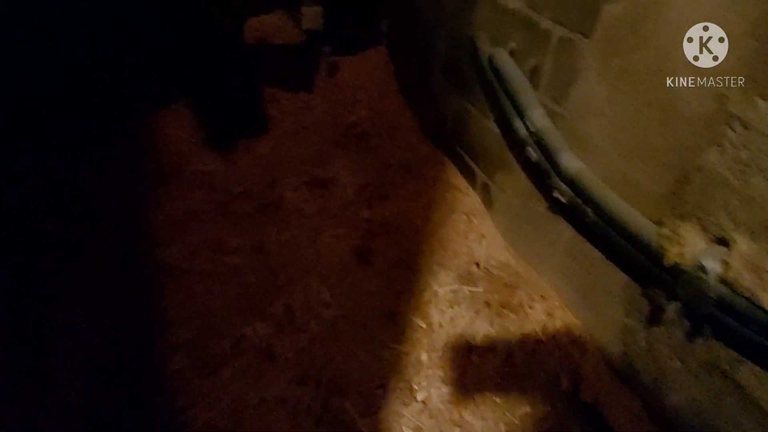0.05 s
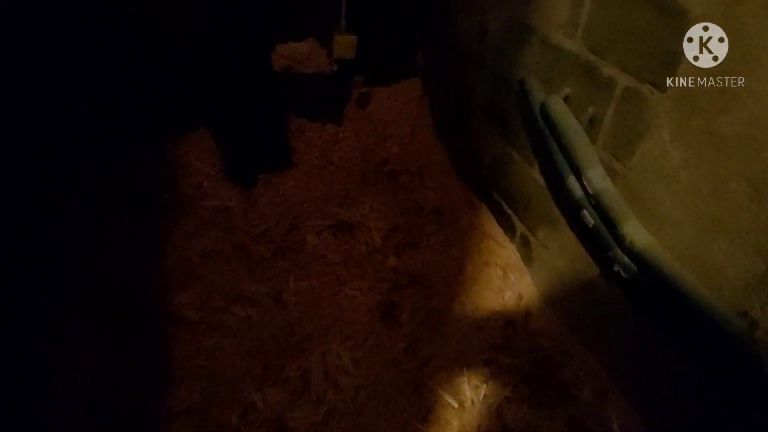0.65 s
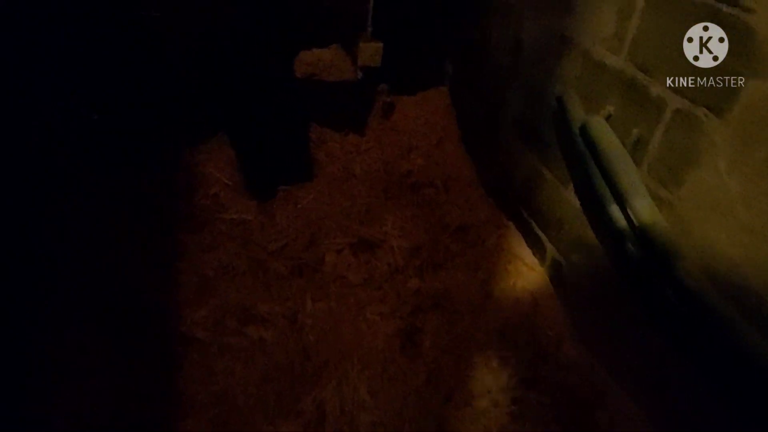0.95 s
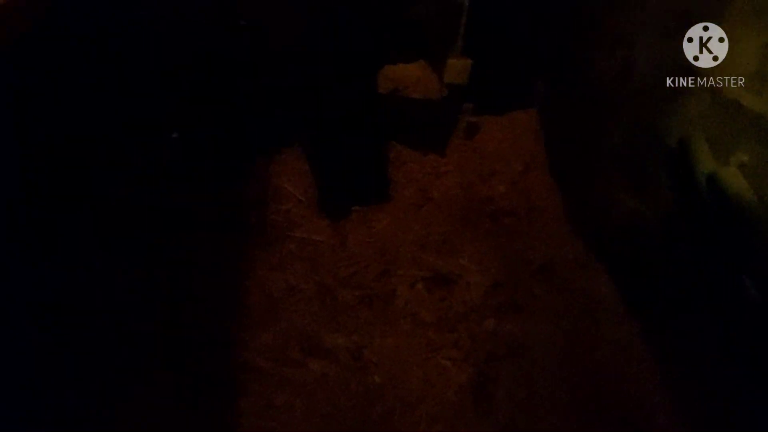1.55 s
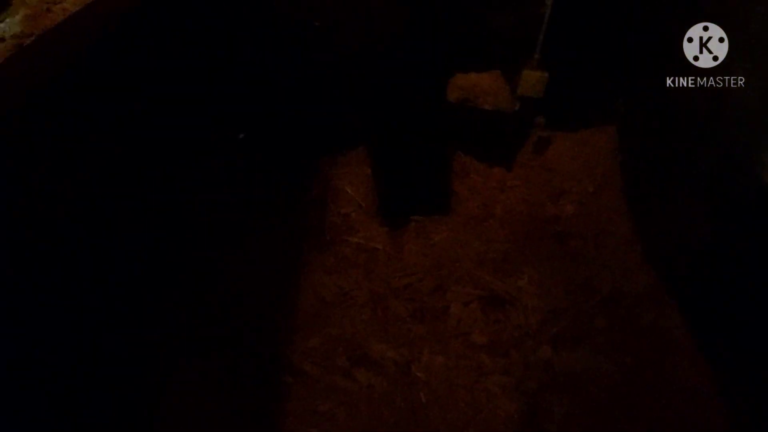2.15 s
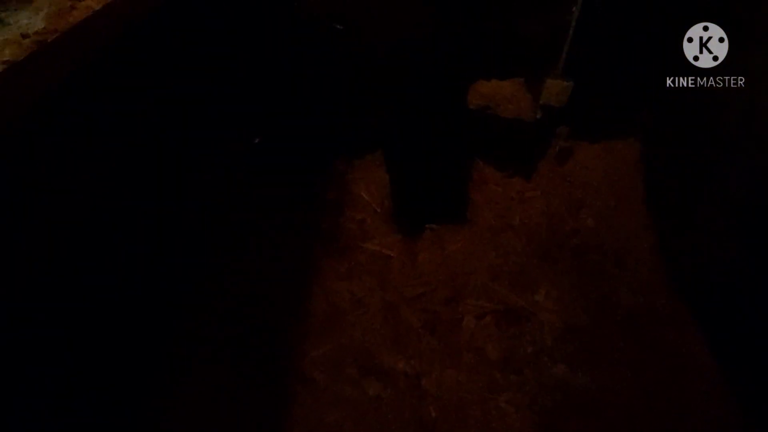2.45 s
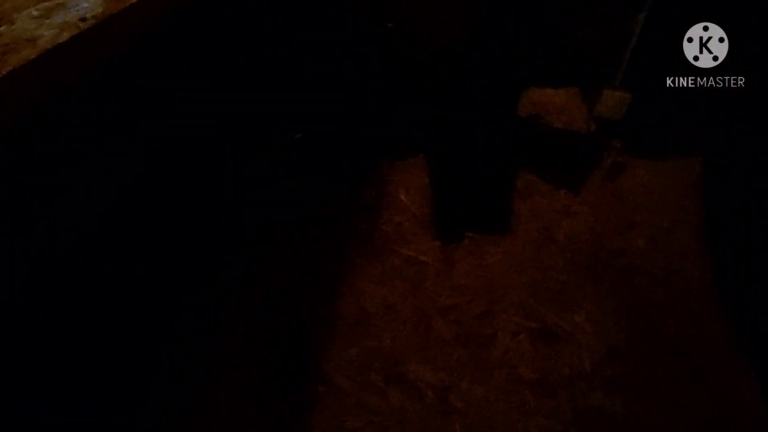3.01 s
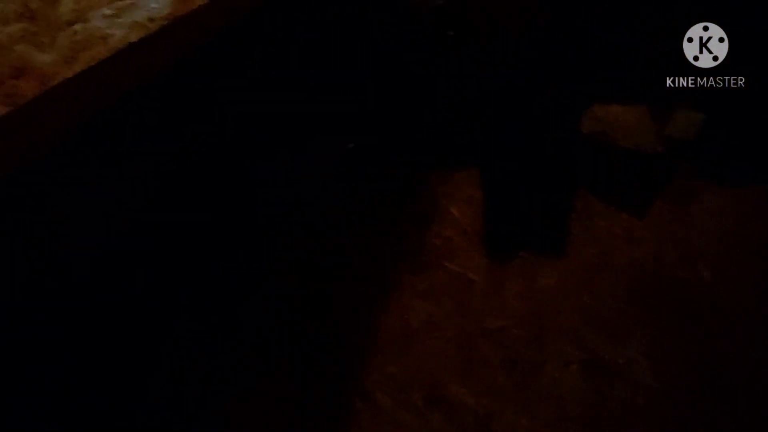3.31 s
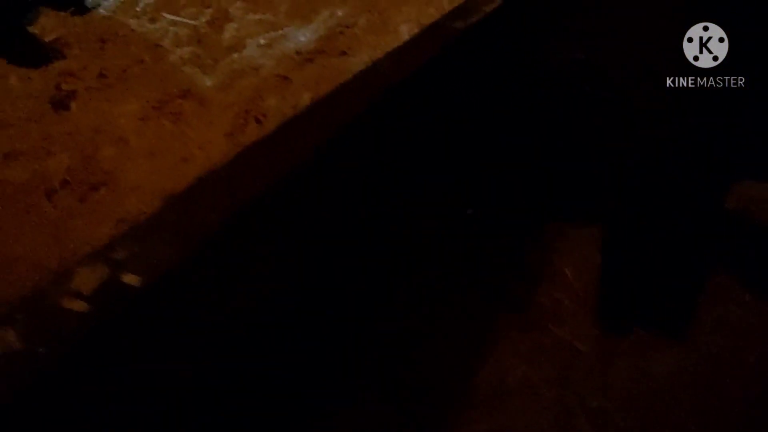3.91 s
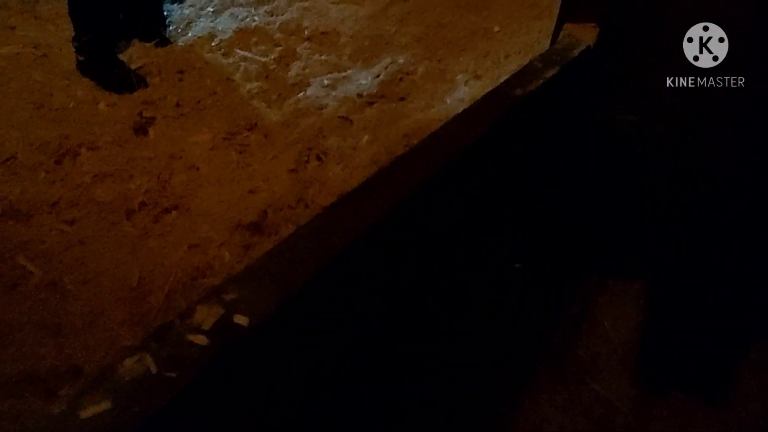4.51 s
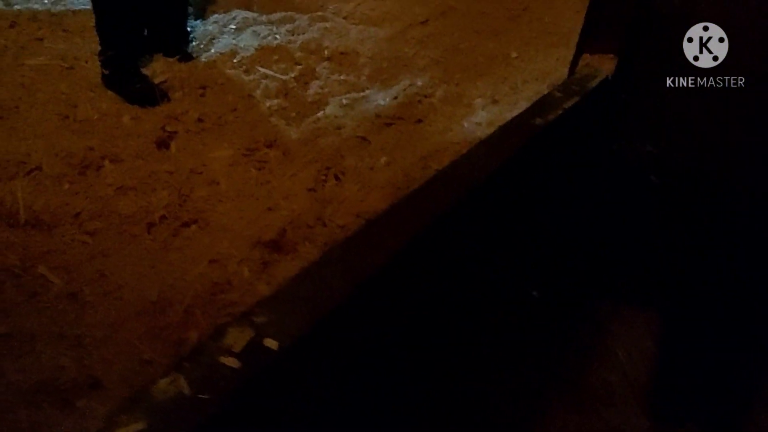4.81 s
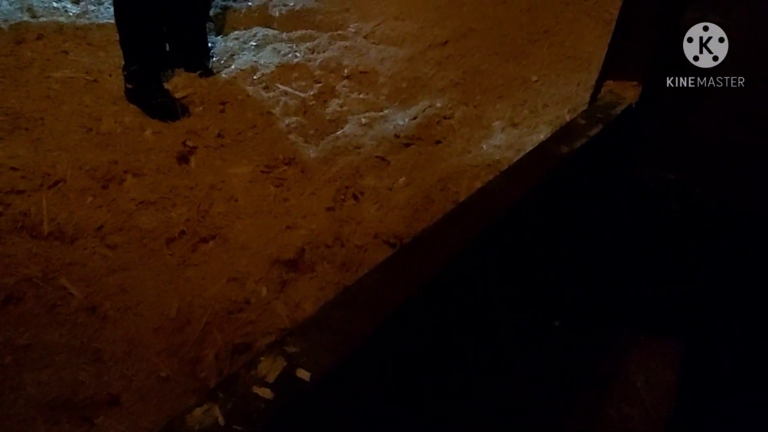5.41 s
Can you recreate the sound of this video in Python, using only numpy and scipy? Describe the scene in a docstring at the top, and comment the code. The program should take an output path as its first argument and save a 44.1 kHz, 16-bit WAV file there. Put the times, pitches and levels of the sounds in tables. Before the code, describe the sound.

Wood chips scrape and sweep across a basement floor, then rustle close by as three heavy thumps hit rattling wooden boards.

```python
"""Dry wood chips scrape over a basement floor: one long push, light strokes and two quick sweeps.
The blade judders and grinds; the chips hiss, crackle and snap among soft footfalls.
Then a bright rustle grows close by, and three heavy thumps with smaller after-knocks ring the modes
of wooden boards, which also rattle and creak. The low stone room rumbles, and booms in answer."""
import sys
import numpy as np
from scipy import signal
from scipy.fft import rfft, irfft, next_fast_len
from scipy.io import wavfile
from scipy.ndimage import uniform_filter1d, map_coordinates

SR = 44100
rng = np.random.default_rng(int(sys.argv[2]) if len(sys.argv) > 2 else 0)


def pcm_store(signal):
    """Save signal as 16-bit PCM."""
    levels = np.round(np.clip(np.atleast_2d(signal), -1, 1) * 32767)
    wavfile.write(sys.argv[1], SR, levels.astype(np.int16).T)


N = 249606
FLOOR_LAG_S = 0.011  # in a sweep the blade meets the floor just after the chips

# Blows on the boards. Each row: start in seconds, force in dB, hardness in dB per octave,
# weight in dB, place from 0 (mid-span) to 1 (near a support).
BOARD_BLOWS = [(3.827, -30.5, 2, -35, 0.93), (3.856, -27, -3, -25.5, 0.37),
               (3.925, -38.5, 1.4, -33.5, 0.084), (4.612, -27, 1, -24.5, 0.81),
               (4.659, -27, -2.5, -31.5, 0.58), (4.732, -42, -5, -32, 0.81), (5.213, -26.5, 3, -40, 0.89),
               (5.24, -20.5, 2, -24.5, 0.85), (5.423, -27, -1, -40, 0.82), (5.479, -36, -1, -45, 0.32)]


def amp(db):
    """Decibels to gain."""
    return 10 ** (np.asarray(db) / 20)


def unit(x):
    """Scaled to rms 1."""
    return x / np.sqrt(np.mean(x ** 2) + 1e-20)


def along(points, hz):
    """(Hz, value) points read on a log axis."""
    point_hz, values = np.transpose(points)
    return np.interp(np.log(hz + 1), np.log(point_hz + 1), values)


def curve(rows):
    """One value per sample from (s, value) rows."""
    return np.interp(np.arange(N) / SR, *np.transpose(rows))


def gains(rows):
    """One gain per sample for each dB column, fading to silence outside the rows."""
    times_s, *columns_db = np.transpose(rows)
    t = np.arange(N) / SR
    fade = np.clip(1 + np.minimum(t - times_s[0], times_s[-1] - t) / 0.024, 0, 1)
    return [fade * amp(np.interp(t, times_s, db)) for db in columns_db]


def swell(start_s, rise_s, hold_s, fall_db_per_s, shape=1):
    """Gain of one gesture: it rises to 1, holds, then dies away."""
    t = np.arange(N) / SR - start_s
    return np.clip(t / rise_s, 0, 1) ** shape * amp(-fall_db_per_s * np.maximum(t - rise_s - hold_s, 0))


def wobble(knots_per_s):
    """A smooth random curve."""
    knots = rng.standard_normal(int(N * knots_per_s / SR) + 4)
    return map_coordinates(knots, [np.arange(N) * knots_per_s / SR])


def filtered(x, response):
    """x times a response of frequency."""
    n = x.shape[-1]
    size = next_fast_len(n + SR // 4)
    return irfft(rfft(x, size) * response(np.fft.rfftfreq(size, 1 / SR)), size)[..., :n]


def band(x, lo_hz, hi_hz, order=2):
    """Causal band-pass."""
    edges_hz = np.clip([lo_hz, hi_hz], 10, [SR / 2 - 2000, SR / 2 - 1000])
    return signal.sosfilt(signal.butter(order, edges_hz, "band", fs=SR, output="sos"), x)


def balance(points, hz):
    """Left and right gains from (Hz, left minus right dB) points."""
    return amp(np.outer([.5, -.5], along(points, hz)))


def paired(x):
    """Two unrelated signals become left and right: alike in the bass, apart in the treble."""
    # Each row: frequency in Hz, left-right correlation.
    likeness = [(100, 0.96), (250, 0.92), (500, 0.46), (1000, -0.17), (2000, 0.088), (5000, -0.0072),
                (15000, 0.04)]
    turn = lambda hz: np.arccos(np.clip(along(likeness, hz), -1, 1)) / 2
    mid, side = filtered(x, lambda hz: np.array([np.cos(turn(hz)), np.sin(turn(hz))]))
    return np.array([mid + side, mid - side])


def coloured(x, spectrum):
    """A stereo sound of rms 1 with the given spectrum."""
    return unit(paired(filtered(x, lambda hz: amp(along(spectrum, hz)))))


def dying_noise(decays, size):
    """Stereo noise in which each frequency dies at its own speed."""
    hz, t, bins = signal.stft(paired(rng.standard_normal((2, size))), SR, nperseg=256)
    decay = amp(-60 * t / along(decays, hz)[:, None])
    return signal.istft(bins * decay, SR, nperseg=256)[1][:, :size]


def add(track, start_s, sound):
    """Mixes a sound into the track."""
    span = track[:, max(round(start_s * SR), 0):][:, :sound.shape[-1]]
    span += sound[..., :span.shape[-1]]


def grains(spectrum, per_s, clump_db, blur=1.0):
    """Tiny slips of uneven size, in clumps, over the blur of countless smaller ones."""
    slips = (rng.random(N) < per_s / SR) * rng.standard_normal((2, N))
    contacts = unit(slips) + blur * rng.standard_normal((2, N))
    return coloured(contacts * amp(clump_db * wobble(70)), spectrum)


def crackle(per_s, spread_db):
    """Sparse tiny fractures of very uneven size, rms 1."""
    sizes = (rng.random(N) < per_s / SR) * amp(spread_db * np.minimum(rng.exponential(size=N), 3))
    decay = np.exp(-np.arange(SR // 500) / (SR * .0004))
    burst = decay * rng.standard_normal((2, len(decay)))
    fractures = signal.fftconvolve(sizes[None], burst, axes=1)[:, :N]
    return unit(band(fractures, 2500, 21000, order=1))


def room_noise():
    """An uneven low rumble of the room that booms after each blow, and a faint even hiss."""
    # Each row: time in seconds, relative level in dB.
    rumble_levels = [(0.0, -63), (0.57, -57.5), (2.45, -70), (3.15, -68), (3.78, -61)]
    # Each row of both: frequency in Hz, relative density in dB.
    rumble_spectrum = [(18, -36), (30, -8), (81, -9), (114, 4.5), (162, -2), (219, -13), (271, -1),
                       (353, -13), (392, -13.5), (531, -24), (700, -20), (910, -18), (1540, -120)]
    hiss_spectrum = [(290, -47), (500, 1.5), (553, -43), (586, -13), (1370, -4.5), (1450, -6.5),
                     (3480, -7.5), (4640, -5), (15500, -8.5)]
    booms = [amp(weight_db - 20) * swell(start_s, rise_s=0.097, hold_s=0, fall_db_per_s=86)
             for start_s, _, _, weight_db, _ in BOARD_BLOWS]
    level = np.linalg.norm([amp(curve(rumble_levels) - 1)] + booms, axis=0)
    uneven = amp(2.5 * wobble(9))
    rumble = coloured(rng.standard_normal((2, N)) * uneven, rumble_spectrum)
    hiss = coloured(rng.standard_normal((2, N)), hiss_spectrum)
    return amp(3.5) * level * rumble + amp(-63.5) * hiss


def cellar_echo(x):
    """The answer of the stone walls: even in colour, a few milliseconds late."""
    # Each row: frequency in Hz, t60 in seconds.
    wall_decays = [(60, 1), (110, 0.6), (250, 0.3), (600, 0.39), (2000, 0.26), (6000, 0.58), (14000, 0.21)]
    spectrum = rfft(dying_noise(wall_decays, size=SR))
    power = uniform_filter1d(np.mean(np.abs(spectrum) ** 2, axis=0), size=14)
    tail = irfft(spectrum / np.sqrt(np.abs(power) + 1e-12))[:, :SR * 3 // 4]
    return signal.fftconvolve(x, np.pad(tail, ((0, 0), (SR // 128, 0))), axes=1)[:, :N]


def footfalls():
    """Soft soles press on the chip bed: a dull, short swell around one pitch."""
    # Each row: start in seconds, relative level in dB, pitch in Hz.
    steps = [(0.072, -51, 407), (0.743, -44, 282), (1.614, -44, 106), (2.005, -48, 69.5), (3.481, -47, 333),
             (3.613, -39, 119)]
    out, t = np.zeros((2, N)), np.arange(SR // 4) / SR
    for start_s, db, hz in steps:
        scuff = unit(band(rng.standard_normal(len(t)), hz / 2, hz * 2))
        press = amp(db - 4 - 60 * t / .14) * (1 - np.exp(-t / .005))
        add(out, start_s, press * (np.sin(2 * np.pi * hz * t) + 0.59 * scuff))
    return out


def creaks():
    """Under a shifting weight, wood rubs on wood in uneven slips that ring one narrow resonance."""
    # Each row: start in seconds, length in seconds, relative level in dB, pitch in Hz.
    shifts = [(4.809, 0.072, -53, 2180), (5.032, .08, -51, 2050)]
    out, slips_per_s = np.zeros((2, N)), 300
    for start_s, length_s, db, hz in shifts:
        size = int(length_s * SR)
        slips = (rng.random(size) < slips_per_s / SR) * rng.normal(1, 0.5, (2, size))
        resonance = unit(band(slips, hz - 90, hz + 90, order=1))
        add(out, start_s, amp(db - 2.5) * np.hanning(size) * resonance)
    return out


def chip_snaps():
    """A chip breaks: a very short, broad click and a brief splintering around one pitch."""
    # Each row: start in seconds, relative level in dB, pitch in Hz.
    breaks = [(0.068, -42.5, 1050), (0.314, -36.5, 2420), (0.7109, -49, 2580), (0.999, -40.5, 3203),
              (1.299, -41.5, 1150), (1.934, -42.5, 7560), (2.5466, -58, 4400), (2.9723, -44.5, 2630),
              (3.128, -47.5, 1392), (3.2014, -34, 4900), (3.232, -37, 4400), (5.5825, -32.5, 5880)]
    out, t = np.zeros((2, N)), np.arange(SR // 20) / SR
    burst = lambda t60_s: rng.standard_normal((2, len(t))) * amp(-60 * t / t60_s)
    for start_s, db, hz in breaks:
        click = band(burst(t60_s=.004), 2200, 15000, order=1)
        splinter = band(burst(t60_s=0.054), hz / np.sqrt(2), hz * np.sqrt(2), order=1)
        add(out, start_s, amp(db + 2) * click / np.abs(click).max())
        add(out, start_s, amp(db - 2) * splinter / np.abs(splinter).max())
    return out


def rustle():
    """A fine, bright rubbing draws nearer and surges as it quickens, with sparse crackles."""
    # Each row: time in seconds, relative level in dB.
    approach = [(3.47, -60.5), (3.82, -54), (3.99, -50.5), (4.41, -55.5), (4.72, -51.5), (4.9, -50),
                (5.36, -46), (5.66, -47.5)]
    # Each row: start in seconds, hold in seconds, relative level in dB.
    quickenings = [(3.819, 0.037, -49.5), (3.921, 0.075, -51.5), (4.144, 0.018, -50), (4.35, 0.077, -53),
                   (5.056, 0.014, -54), (5.202, 0.011, -40.5)]
    # Each row: frequency in Hz, relative density in dB.
    fizz_spectrum = [(290, -47), (500, -6), (561, -35), (792, -6.5), (982, -8), (1100, -2.5), (1350, -8),
                     (1770, -4.5), (2010, -3), (2200, -5.5), (3060, -4), (4310, -0.5), (6550, -4),
                     (12000, -1), (15500, -7)]
    surges = [amp(db) * swell(start_s, rise_s=0.006, hold_s=hold_s, fall_db_per_s=207)
              for start_s, hold_s, db in quickenings]
    level = np.linalg.norm([amp(-1) * gains(approach)[0]] + surges, axis=0)
    crackles = amp(-14) * crackle(per_s=70, spread_db=3.5)
    fizz = grains(fizz_spectrum, per_s=4000, clump_db=0.77, blur=1.27)
    return amp(4.5) * level * (fizz + crackles)


def sweep_gains(lag_s):
    """Gains of spray, rasp and blade drone over all sweeps."""
    # Each row: start in seconds, rise in seconds, fall in dB per second,
    # then relative levels of spray, rasp and drone in dB.
    gestures = [(1.945, 0.064, 263, -48, -57, -50.5), (3.119, 0.11, 81, -42.5, -51, -72),
                (3.239, 0.012, 143, -50.5, -48.5, -74)]
    return sum(np.outer(amp(levels_db), swell(start_s + lag_s, rise_s, 0, fall_db_per_s, shape=0.66))
               for start_s, rise_s, fall_db_per_s, *levels_db in gestures)


def sweeps():
    """A quick stroke sprays loose chips and rasps on the floor beneath."""
    # Each row of both: frequency in Hz, relative density in dB.
    rasp_spectrum = [(300, -20), (560, -16), (780, 3.5), (1050, 0.5), (1420, 4), (1700, 2), (2070, 4),
                     (2450, -2), (2800, -0.5), (3600, -9.5), (5000, -13), (9000, -50)]
    spray_spectrum = [(1500, -10), (3300, -6), (4600, -5), (6500, -7), (8500, -5.5), (13000, -7.5),
                      (15500, -8)]
    rasp = sweep_gains(FLOOR_LAG_S)[1] * grains(rasp_spectrum, per_s=2300, clump_db=2.25, blur=0.8)
    spray = sweep_gains(0)[0] * grains(spray_spectrum, per_s=6000, clump_db=1.7)
    return rasp + amp(-1) * spray


def blade_gains():
    """Gains of blade drone and chip hiss in the push and light strokes; sweeps add to the drone."""
    # Each row: time in seconds, relative levels of drone and hiss in dB.
    long_push = [(0.1, -74, -71), (0.144, -69, -66), (0.296, -46.5, -52.5), (0.314, -51.5, -51.5),
                 (0.69, -59.5, -60.5), (0.732, -54.5, -59), (0.97, -63.5, -65), (1.008, -52.5, -61),
                 (1.312, -52.5, -57), (1.406, -61.5, -63.5), (1.46, -104, -76)]
    # Each row: start in seconds, length in seconds, relative levels of hiss and drone in dB.
    light_strokes = [(0.021, 0.037, -64.5, -64), (1.474, .03, -62, -73), (1.575, 0.32, -78.5, -88),
                     (2.174, 0.17, -68.5, -91), (2.352, 0.19, -65, -68.5), (2.64, 0.11, -66, -65.5),
                     (2.873, 0.17, -67, -64.5)]
    push_drone, push_hiss = gains(long_push)
    drone = amp(2) * push_drone + sweep_gains(FLOOR_LAG_S)[2]
    hiss = amp(0.84) * push_hiss
    rise_s = 0.038
    for start_s, length_s, hiss_db, drone_db in light_strokes:
        stroke = swell(start_s, rise_s, max(length_s - rise_s, 0), fall_db_per_s=158)
        drone += amp(drone_db) * stroke
        hiss += amp(hiss_db) * stroke
    return drone, hiss


def scrape():
    """The blade judders over the floor while the chips ahead of it rub, hiss and crackle."""
    # The judder follows the pressure on the blade. Each row: time in seconds, pitch in Hz.
    judder_pitch = [(0, 420), (.33, 450.5), (.47, 430), (.62, 289.6), (.85, 279.8), (1.08, 346.4),
                    (1.3, 319), (2, 282.5), (3.1, 340.7)]
    # Each row of both: frequency in Hz, relative density in dB.
    blade_spectrum = [(130, -15), (250, 7.5), (450, 6.5), (600, 4), (900, 0.5), (1300, -2.5), (2000, -32),
                      (4000, -58)]
    chip_spectrum = [(500, -7.5), (1000, -5.5), (1600, -4), (2500, 0.5), (3600, -2), (5600, -2.5),
                     (6900, -11), (8000, -3.5), (9500, -9), (11700, -6.5), (13200, -11.5), (15500, -10.5)]
    # The chips lie low and to one side. Each row: frequency in Hz, left minus right in dB.
    chip_balance = [(1000, 10.5), (2500, -1), (8000, 1), (9800, 2), (12000, 7), (15000, 0)]
    # The hiss brightens as the blade moves on. Each row: time in seconds, frequency ratio.
    hiss_glide = [(0, 0.95), (.4, 1.005), (1.15, 1.026), (2.3, 1.06), (3.1, 0.97)]
    drone_gain, hiss_gain = blade_gains()
    phase = 2 * np.pi * np.cumsum(curve(judder_pitch)) / SR
    # stick and slip keep only a loose pitch
    judder = unit(wobble(110) * np.sin(phase) + wobble(110) * np.cos(phase))
    grinding = grains(blade_spectrum, per_s=400, clump_db=1.5)
    rubbing = grains(chip_spectrum, per_s=5000, clump_db=0.98)
    rubbing = filtered(rubbing, lambda hz: balance(chip_balance, hz))
    read_index = np.cumsum(curve(hiss_glide))
    rubbing = np.array([map_coordinates(side, [read_index], mode="mirror") for side in rubbing])
    rubbing += amp(-18) * crackle(per_s=60, spread_db=3)
    return drone_gain * (amp(-7.5) * judder + amp(-3.5) * grinding) + amp(4) * hiss_gain * rubbing


def registers_db(force_db, hardness):
    """Levels of body, knock, clack and crack: a harder contact favours the higher ones."""
    # Each row: octaves above the body, level relative to the force in dB.
    registers = [(0, 0.5), (2, -5), (3, -16), (4, -22)]
    octaves, offset_db = np.transpose(registers)
    return force_db + offset_db + hardness * octaves


def rattles(count=2, delay_s=.016, gap_s=.009, pitch_hz=2344, t60_s=0.019):
    """The quick clacks of a loose board after each blow, as rows for board_chatter."""
    detunes = 1 + 0.04 * rng.standard_normal((len(BOARD_BLOWS), count))
    clacks = []
    for (start_s, force_db, hardness, _, _), ratios in zip(BOARD_BLOWS, detunes):
        db = registers_db(force_db, hardness)[2] + 7
        clacks += [(start_s + delay_s + k * gap_s, db, pitch_hz * ratios[k], t60_s) for k in range(count)]
    return clacks


def board_chatter():
    """Loose boards are knocked into rocking, each with one short, hollow note."""
    # Each row: start in seconds, relative level in dB, pitch in Hz, t60 in seconds.
    rockings = [(1.492, -49.5, 1960, .014), (3.829, -29, 367.5, 0.13), (3.852, -28.5, 2160, .018),
                (4.631, -23, 283, 0.077), (4.685, -26, 227.3, 0.18), (5.215, -18, 215, 0.071),
                (5.241, -3.5, 998, 0.014), (5.248, -9, 1885, 0.013), (5.253, -29, 249.8, 0.27),
                (5.426, -24, 197.5, 0.071), (5.427, -30, 138, 0.18)]
    out, t = np.zeros((2, N)), np.arange(SR // 3) / SR
    for start_s, db, hz, t60_s in rockings + rattles():
        lag_rad = np.array([[.5], [-.5]]) * min(hz / 750, 1.6)
        envelope = amp(db + 5 - 60 * t / t60_s) * (1 - np.exp(-t * hz))
        add(out, start_s, envelope * np.sin(2 * np.pi * hz * t + lag_rad))
    return out


def thumps():
    """Each blow heaves the floor and rings the boards; harder contacts reach the higher modes."""
    # Each row: frequency in Hz, relative level in dB, t60 in seconds.
    board_modes = [(53, -4, 0.26), (61.4, -2, 0.18), (100.8, -7, 0.32), (113.5, 5, 0.11),
                   (188.3, -0.5, 0.38), (209.6, 2.5, 0.29), (230.3, 2.5, 0.19), (257.9, -3.5, 0.35),
                   (304.4, -13.5, 0.5), (373.2, -8, 0.25), (447, -8.5, 0.23), (646, -21, 0.069),
                   (664, -5.5, 0.5), (768, -1.5, 0.29), (890, -3.5, 0.33), (946, 8, 0.04),
                   (1093, 6.5, 0.023), (1157, -7, .16), (1532, -1, 0.099), (1788, 11.5, 0.1),
                   (1813, 24, 0.041), (2060, -9, 0.29), (2022, 13.5, 0.31), (2440, -1, 0.05),
                   (2740, -3, 0.16), (3434, -8.5, 0.046), (3787, -12, 0.082), (4350, -10, 0.06)]
    # Each row: frequency in Hz, t60 in seconds.
    clatter_decays = [(200, 0.31), (1000, 0.18), (3000, 0.23), (9000, 0.029)]
    out, t = np.zeros((2, N)), np.arange(SR // 2) / SR
    hz, level_db, t60_s = np.transpose(board_modes)[:, :, None]
    unit_attack = lambda x: x / np.sqrt(np.mean(x[:, :SR // 32] ** 2))
    for start_s, force_db, hardness, weight_db, place in BOARD_BLOWS:
        body_db, knock_db, clack_db, crack_db = registers_db(force_db, hardness)
        # short waves reach left and right out of step
        lag_rad = rng.standard_normal((2, len(hz), 1)) * np.minimum(hz / 1200, 1.3)
        load_detune = 1 + .014 * rng.standard_normal(hz.shape)
        envelopes = amp(level_db + 2 * rng.standard_normal(hz.shape) - 60 * t / t60_s)
        modes = -envelopes * np.sin(2 * np.pi * hz * load_detune * t + lag_rad)
        clatter = dying_noise(clatter_decays, size=len(t)) * (1 + np.exp(-t / 0.0024))

        def ring(lo_hz, hi_hz):
            return unit_attack(modes[:, (hz[:, 0] > lo_hz) & (hz[:, 0] <= hi_hz)].sum(axis=1))

        def wood(lo_hz, hi_hz, rough):
            noise = unit_attack(band(clatter, lo_hz, hi_hz, order=4))
            return unit_attack(ring(lo_hz, hi_hz) + rough * noise)

        # mid-span the floor heaves, near a support it thuds
        heave = amp(weight_db + 3.5) * np.cos(place * np.pi / 2) * ring(0, 80)
        thud = amp(weight_db - 2.5) * np.sin(place * np.pi / 2) * ring(80, 150)
        body = amp(body_db - 4) * wood(100, 653, rough=0.44)
        knock = amp(knock_db - 5) * wood(498, 1790, rough=1.2)
        clack = amp(clack_db) * wood(1420, 3300, rough=1)
        crack = amp(crack_db) * wood(2850, 6100, rough=1.65)
        add(out, start_s, heave + thud + body + knock + clack + crack)
    return out


def scene():
    """All sources in the cellar; the blows and small sounds echo."""
    blows = thumps() + board_chatter()
    small = chip_snaps() + footfalls() + creaks()
    echo = cellar_echo(amp(-8.5) * blows + amp(-1) * small)
    return blows + small + echo + scrape() + sweeps() + rustle() + room_noise()


def record(dry):
    """The microphone sheds deep bass and the top treble; each of its two ports has its own colour."""
    # Each row: frequency in Hz, left minus right in dB.
    port_balance = [(60, -1), (200, 2.2), (500, 0), (1100, -3), (2000, -2.5), (2900, 2), (4500, -7.5),
                    (6500, -2.5), (8000, -6.5), (9500, 7), (11500, 3), (15000, -1.5)]
    low_cut_hz, top_hz = 40, 15650
    thinned = signal.sosfilt(signal.butter(5, low_cut_hz, "high", fs=SR, output="sos"), dry)
    return filtered(thinned, lambda hz: balance(port_balance, hz) * (hz < top_hz))


dry = scene()
out = record(dry)
pcm_store(out)
```